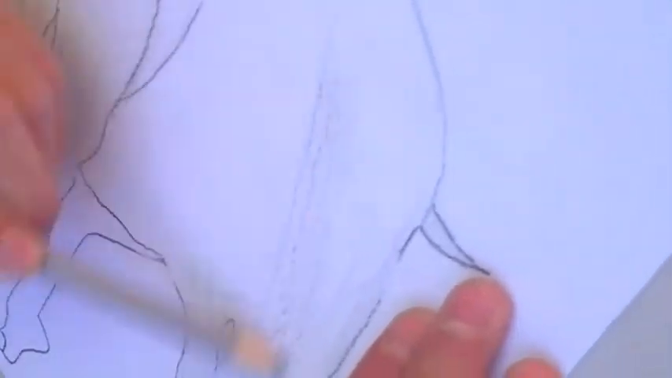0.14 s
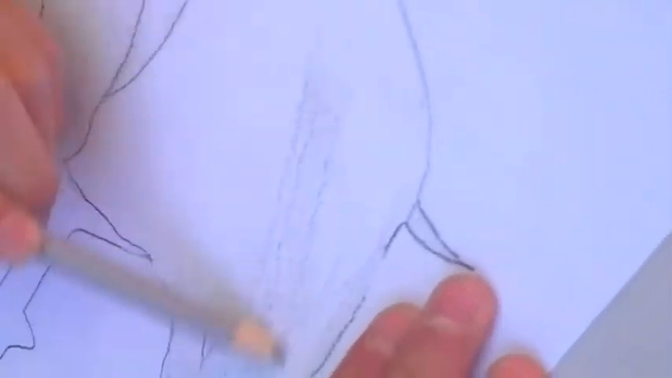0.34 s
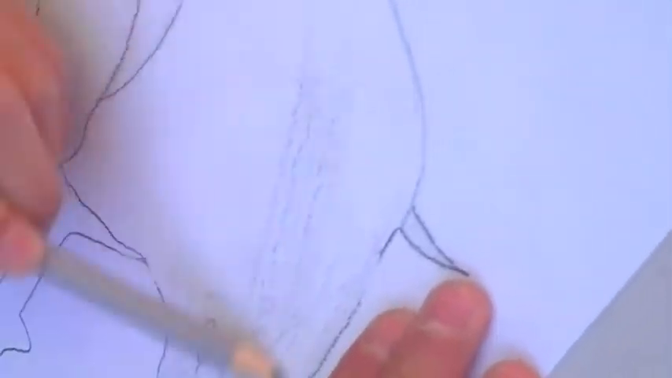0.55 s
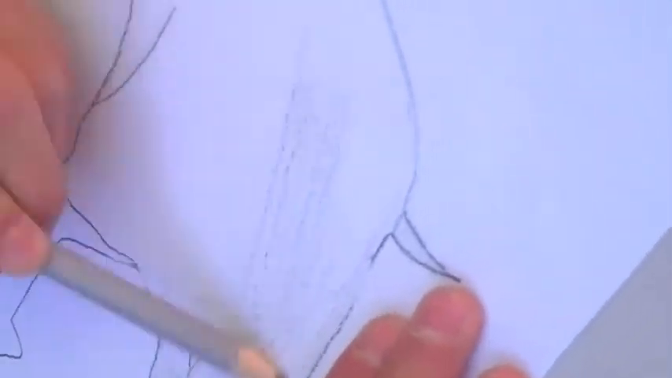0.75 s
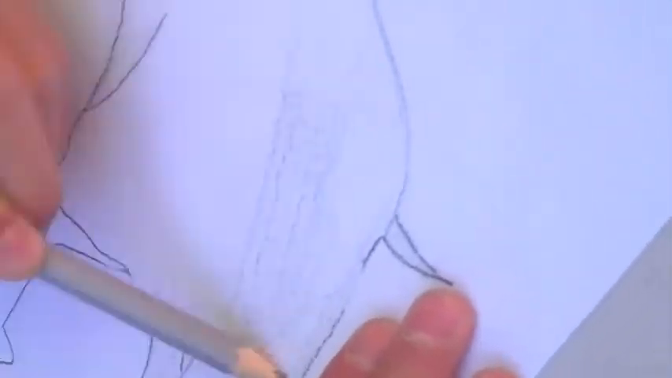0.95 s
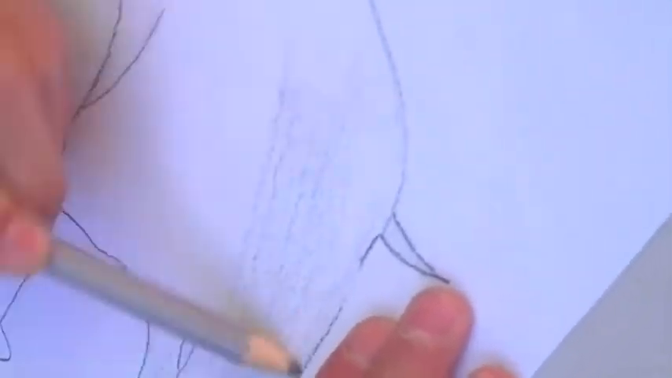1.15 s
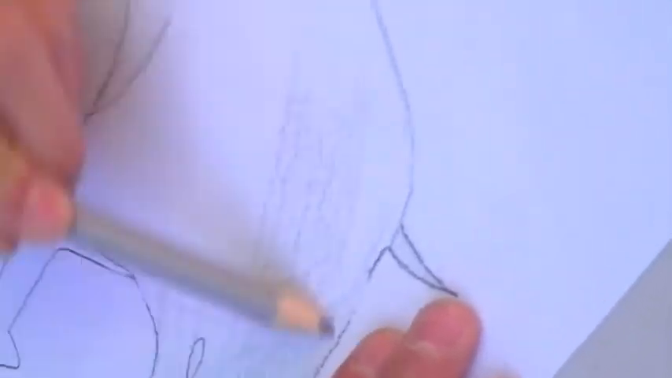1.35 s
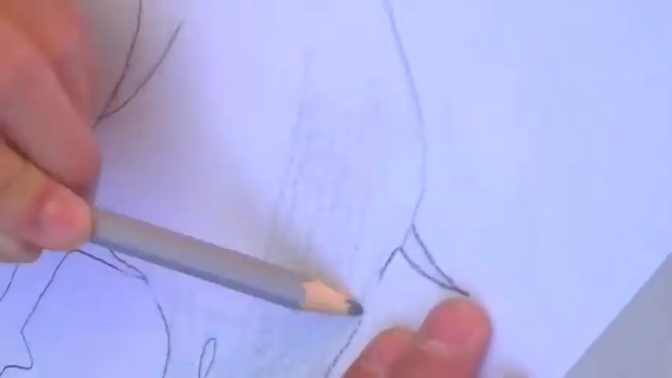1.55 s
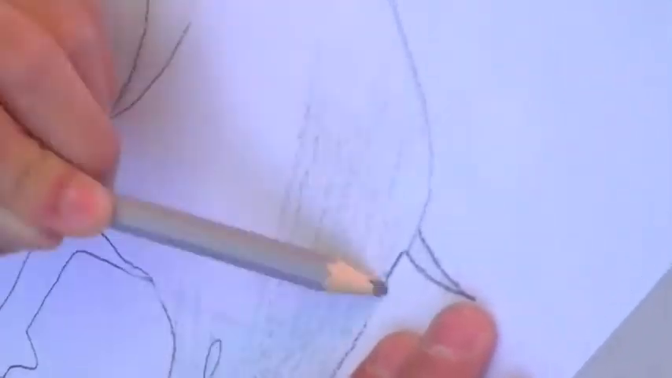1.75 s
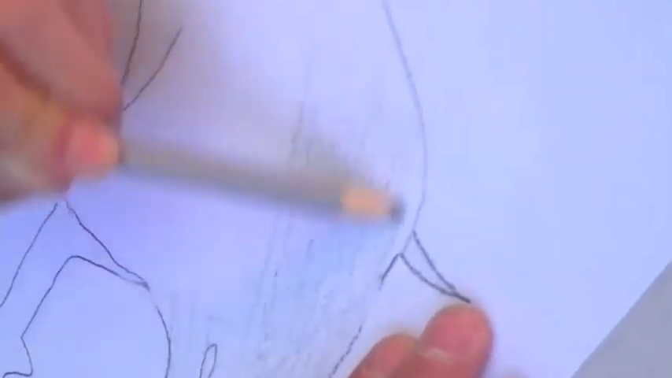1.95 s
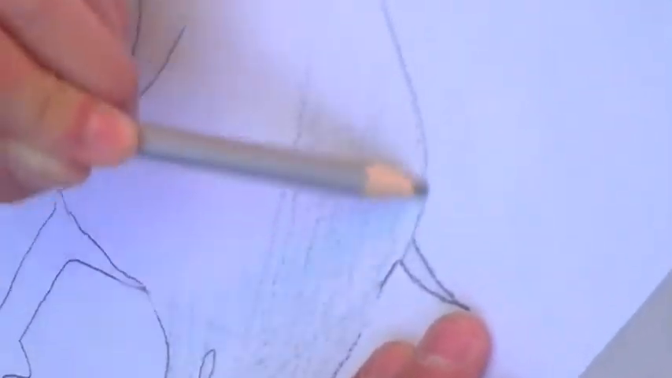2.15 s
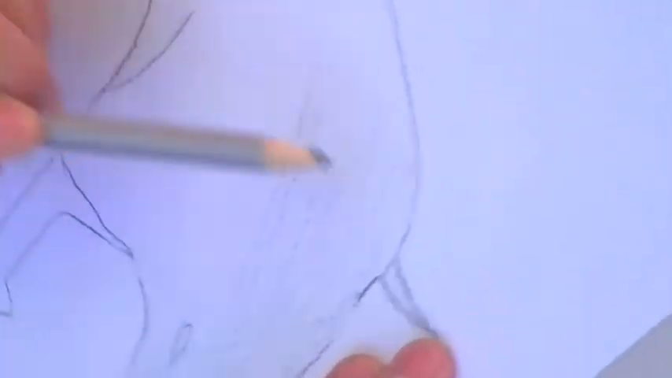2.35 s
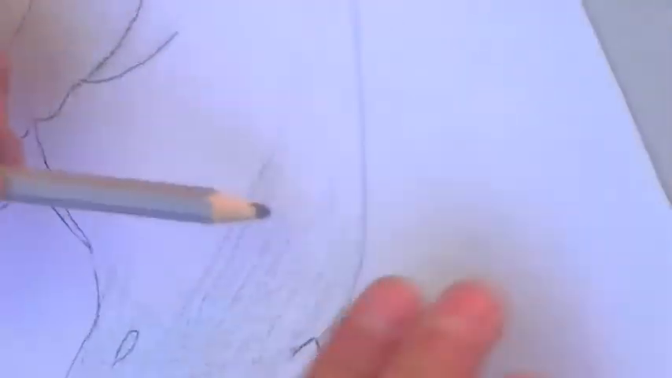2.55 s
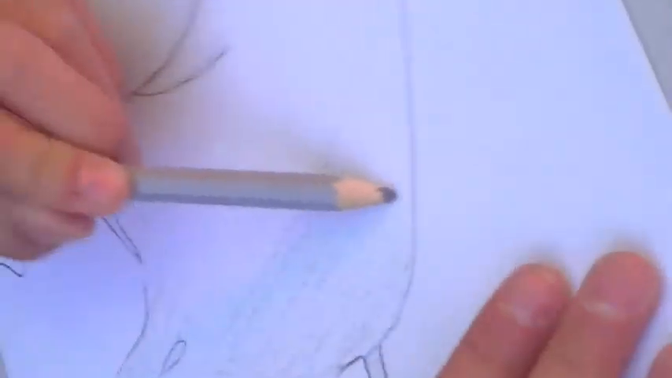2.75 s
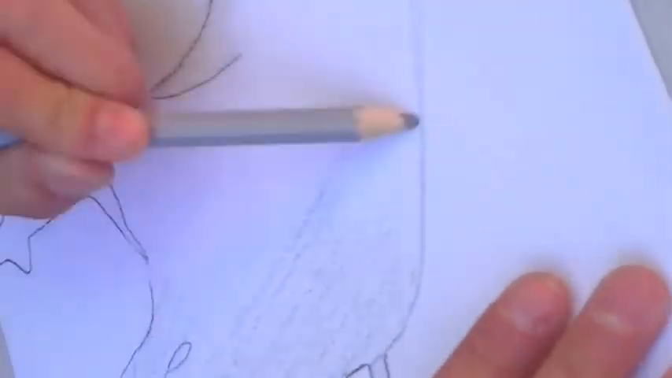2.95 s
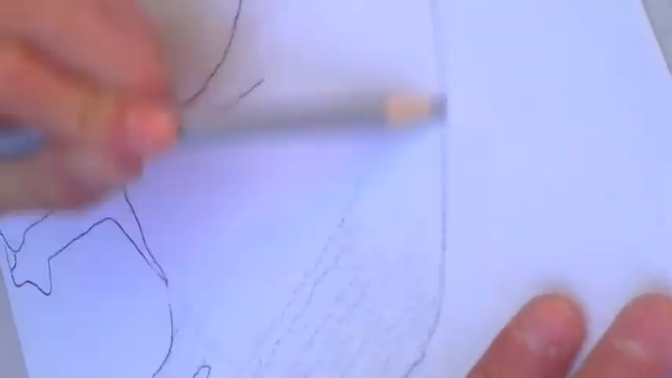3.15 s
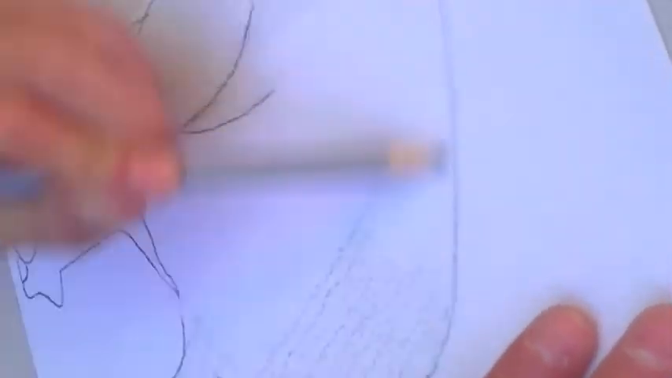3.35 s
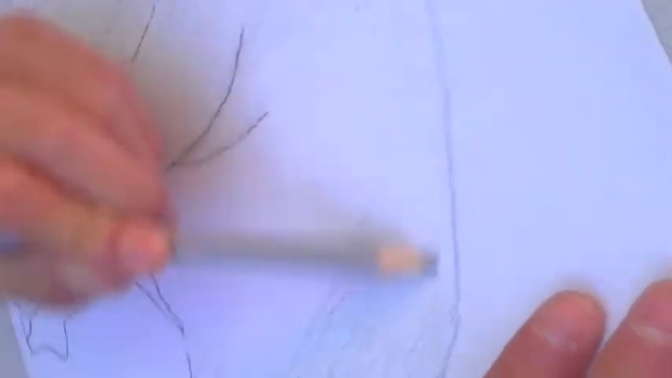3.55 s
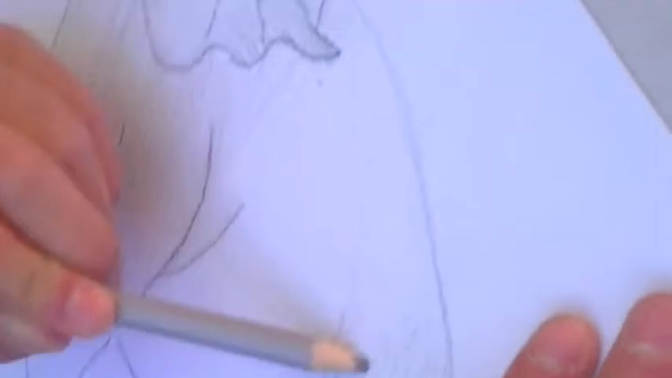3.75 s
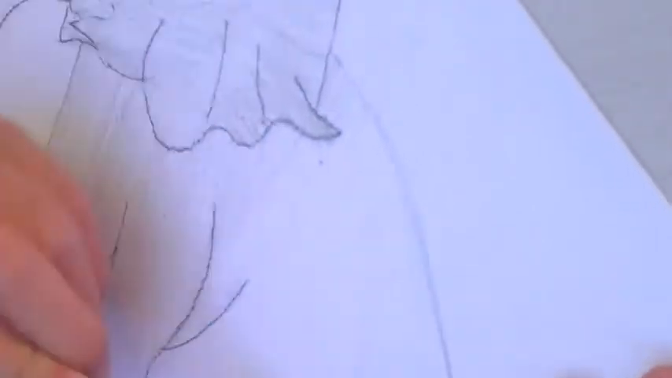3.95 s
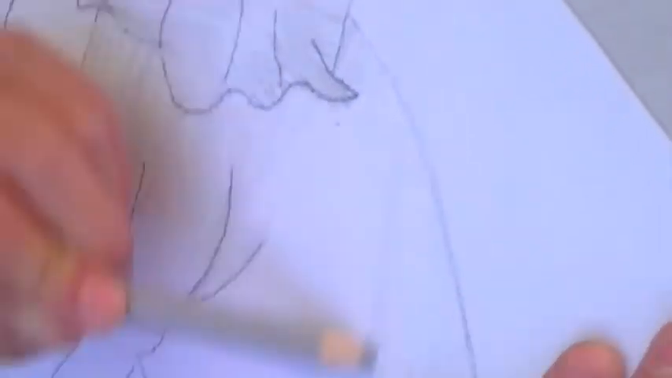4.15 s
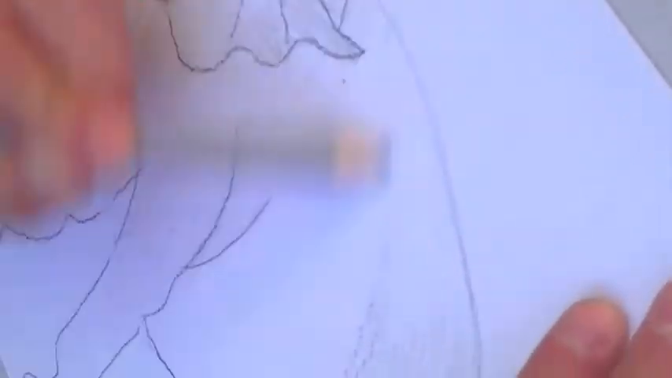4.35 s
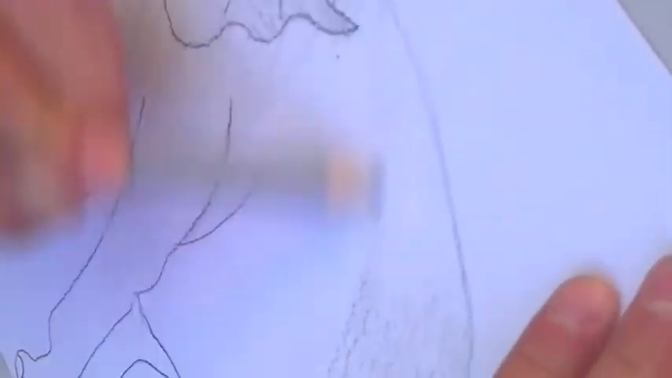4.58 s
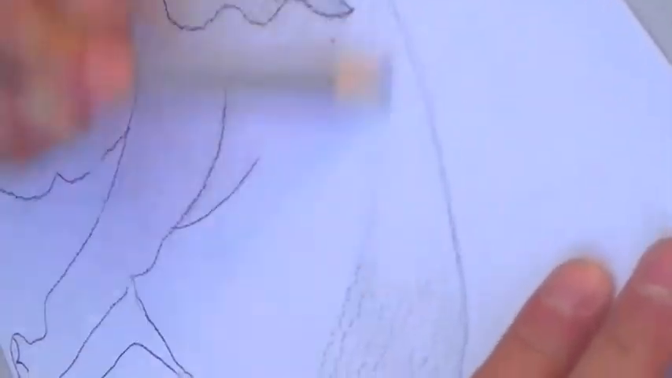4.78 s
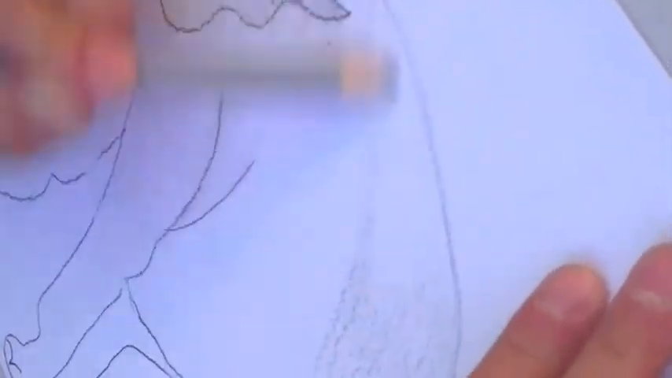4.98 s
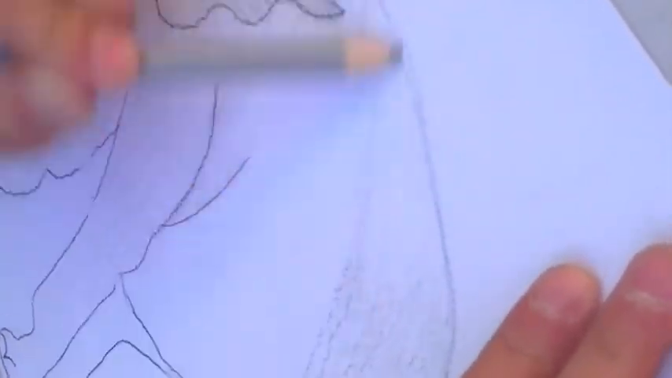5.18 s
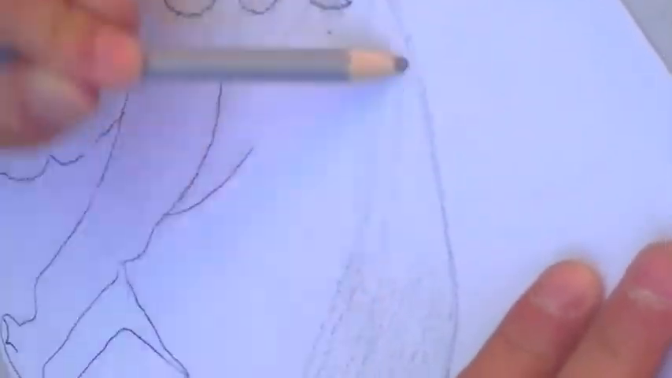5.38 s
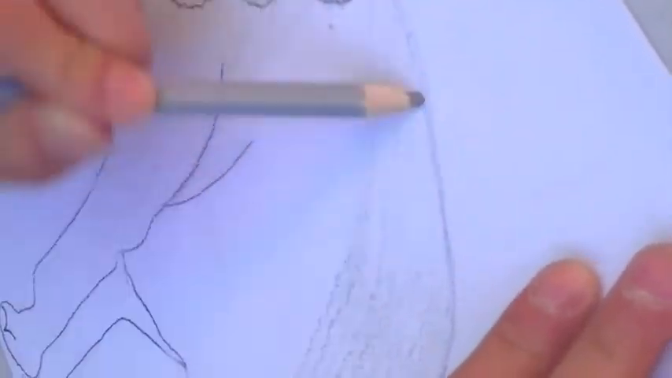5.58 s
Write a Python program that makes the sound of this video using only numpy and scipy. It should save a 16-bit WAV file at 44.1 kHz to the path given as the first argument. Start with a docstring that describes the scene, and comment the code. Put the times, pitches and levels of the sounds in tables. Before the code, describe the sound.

A pencil shades paper on a table, very close to a small stereo microphone. Rapid back-and-forth strokes rasp about ten times a second, with a papery ring. Hard clicks strike early and near one and a half seconds; the scratching softens and slows in the middle, then returns, with a cluster of knocks near four seconds. Steady hiss lies beneath in a small dry room.

```python
"""Pencil shading at a table

A coloured pencil shades paper on a table in a quiet, hissing room, close to a small stereo microphone.
The lead's rasp is shaped noise, louder and brighter in mid-stroke, about ten strokes a second.
Pencil and sheet ring as noise-driven resonances, strongest near 2 kHz.
Now and then the pencil knocks on the table through the paper: filtered impulses ring decaying modes.
Slips of the sheet add soft scuffs, brief swells of one resonance."""
import sys
import numpy as np
from scipy import signal
from scipy.fft import rfft, irfft
from scipy.io import wavfile
from scipy.ndimage import uniform_filter1d

SR = 44100
rng = np.random.default_rng(int(sys.argv[2]) if len(sys.argv) > 2 else 0)


def put_to_file(sound):
    """Save the sound as 16-bit audio at rate SR, in the file named by the first command-line argument."""
    columns = np.atleast_2d(sound).T  # one column per channel
    safe = np.clip(columns, -1, 1)
    whole_steps = np.round(safe * 32767)
    wavfile.write(sys.argv[1], SR, whole_steps.astype(np.int16))


N = 247842


def undb(db):
    """Decibels to gain."""
    return 10 ** (np.asarray(db) / 20)


def unit(x):
    """Scale to rms 1."""
    return x / np.sqrt(np.mean(x ** 2))


def walk(rate_hz):
    """Smooth random wandering with rms 1: noise averaged twice over 1 / rate_hz seconds."""
    span = max(int(SR / rate_hz), 1)
    noise = rng.standard_normal(N)
    return unit(uniform_filter1d(uniform_filter1d(noise, span), span))


def shape(points):
    """Gain at every frequency bin, joining (f/Hz, level/dB) points on a log frequency axis."""
    hz, db = np.transpose(points)
    bins_hz = np.fft.rfftfreq(N, 1 / SR)
    return undb(np.interp(np.log(bins_hz + 1), np.log(hz), db))  # +1 avoids log 0


def hiss(colour, side):
    """Stereo noise of a given colour and width; rms 1 in the middle."""
    spectra = rfft(rng.standard_normal((2, N))) * shape(colour)
    spectra[1] *= shape(side)
    mid, wide = irfft(spectra, N)
    return np.array([mid + wide, mid - wide]) / mid.std()


# stereo width of the pencil, close to the microphone: f/Hz, side minus mid level/dB
PENCIL_SIDE = [(150, -5), (400, -26), (1400, -43), (2300, -8), (4400, -5.5), (6500, -6), (8500, 1),
               (14000, 0.5)]


def resonance(hz, width_hz, shift):
    """A resonance driven by dense friction: noise about a moving centre hz * shift; rms 1 in the middle."""
    pole = np.exp(-2 * np.pi * .78 * width_hz / SR)  # two such poles give the -3 dB width
    drive = rng.standard_normal((2, N)) + 1j * rng.standard_normal((2, N))
    envelope = signal.lfilter([1], [1, -2 * pole, pole ** 2], drive)
    carrier = np.exp(2j * np.pi * np.cumsum(hz * shift) / SR)
    mid, wide = unit((envelope * carrier).real)
    wide = wide * undb(np.interp(hz, *np.transpose(PENCIL_SIDE)))
    return np.array([mid + wide, mid - wide])


# colour of the room and microphone hiss: f/Hz, relative level per Hz/dB
HISS_COLOUR = [(25, 20), (60, -7.5), (130, -1.5), (340, 3), (600, -1.5), (1000, -8.5), (1300, 3.5),
               (1600, -2), (2500, 3), (4900, 1), (6500, -12), (8000, -13), (12000, -22.5), (15000, -34)]
# its stereo width: f/Hz, side minus mid level/dB
HISS_SIDE = [(100, 3.5), (400, 2), (1300, -9), (2500, -7), (5000, -4.5), (9000, 0.5)]


def background():
    """Hiss of the room and the microphone: shaped noise whose level wavers slightly."""
    level_db = -51 + .5 * walk(30)
    return hiss(HISS_COLOUR, HISS_SIDE) * undb(level_db)


# runs of back-and-forth strokes, each at an even pace until the next begins:
# start t/s, number of strokes, lean level/dB (added on one direction, taken off the other)
STROKE_RUNS = [(0.018, 9, 1.7), (0.942, 5, -0.6), (1.467, 5, 0.5), (1.928, 2, -0.5), (2.098, 3, .9),
               (2.365, 1, .5), (2.585, 1, -6.5), (2.829, 3, 1), (3.155, 6, 0), (3.842, 8, 1),
               (4.731, 9, 0.5)]
# single strokes with extra pressure (0 leaves the stroke as it is): t/s, extra level/dB
STROKE_ACCENTS = [(0.68, 0), (0.89, 1), (3.21, 3), (3.44, 1.5), (4.78, 0.5), (5.41, 1.5)]


def hand(stick=.75):
    """Tip speed (0 at each turn, 1 in full swing) and the extra pressure of the current stroke in dB."""
    last_turn_s, speed_up_s, slow_down_s = 5.678, .048, .056
    start, count, lean_db = np.transpose(STROKE_RUNS)
    t = np.arange(N) / SR
    edges, count = np.append(start, last_turn_s), np.rint(count)
    done = np.append(0, np.cumsum(count))
    travel = np.interp(t, edges, done)  # strokes made so far
    stroke, along = travel.astype(int), travel % 1
    run = np.clip(np.searchsorted(start, t) - 1, 0, len(start) - 1)
    length_s = (np.diff(edges) / count)[run]
    direction = 1 - 2 * ((stroke - done[run]) % 2)
    since_turn, until_turn = along * length_s, (1 - along) * length_s
    swing = np.clip(np.minimum(since_turn / speed_up_s, until_turn / slow_down_s), 0, 1)
    # the waxy lead clings after each turn, then breaks free
    clinging = since_turn < rng.uniform(.01, .032, stroke.max() + 1)[stroke]
    speed = np.sin(np.pi / 2 * swing) * np.where(clinging, stick, 1)
    accent_db = sum(db * (stroke == int(np.interp(s, edges, done))) for s, db in STROKE_ACCENTS)
    return speed, direction * lean_db[run] + accent_db


def snags():
    """The lead catches on raised fibres: sudden jumps in dB that relax within milliseconds, mean 0."""
    per_second, base_jump_db, relax_s = 30, 1.2, 0.008
    caught = rng.random(N) < per_second / SR
    catches = caught * rng.uniform(0.65, 2.4, N) * base_jump_db
    jumps = signal.lfilter([1], [1, -np.exp(-1 / (relax_s * SR))], catches)
    return jumps - jumps.mean()


def patchy(x, depth_db, across_hz, lasting_s, size=256):
    """The paper's tooth differs by spot: neighbouring frequencies swell and fade together for moments."""
    hz, s, spectra = signal.stft(x, SR, nperseg=size)
    field = rng.standard_normal(spectra.shape[1:])
    for axis, span in enumerate([across_hz / hz[1], lasting_s / s[1]]):
        span = max(int(span), 1)
        field = uniform_filter1d(uniform_filter1d(field, span, axis=axis), span, axis=axis)
    gain = unit(undb(depth_db * unit(field)))
    return signal.istft(spectra * gain, SR, nperseg=size)[1][:, :N]


# working levels in mid-stroke, before pressure changes:
# t/s, rasp level/dB, ring of pencil and sheet level/dB, finest grain level/dB
HAND_EFFORT = [(0.0, -42, -38.5, -55.5), (0.38, -43, -41, -52.5), (0.88, -43.5, -40.5, -53.5),
               (1.25, -45.5, -42.5, -53.5), (1.65, -47.0, -43.5, -53.5), (2.0, -47, -55.5, -57.5),
               (2.25, -52, -64, -62), (2.48, -50, -65, -57.5), (2.7, -58.5, -62, -78),
               (3.0, -46.5, -45.5, -60.0), (3.2, -47, -46, -75), (3.5, -47, -46, -61),
               (3.75, -52.5, -53.5, -62), (4.22, -47, -43.5, -56), (4.6, -47.5, -43.0, -56.5),
               (4.95, -48.5, -43, -59.5), (5.3, -46, -41, -58.5), (5.62, -45.0, -41.5, -58)]
# friction noise of the lead on the paper: f/Hz, relative level per Hz/dB
RASP_COLOUR = [(100, -41), (330, -25), (600, -33), (1000, -36), (1400, -2.5), (2600, -5.5), (3300, 0.5),
               (4100, 3), (5100, 3), (6850, 5.5), (7800, -9.5), (9500, -12), (13000, -47)]
# its finest grain: f/Hz, relative level per Hz/dB
GRAIN_COLOUR = [(3000, -2.5), (6000, 5), (8000, 0.5), (9000, 3), (10000, -5.5), (11500, -1.5),
                (13000, -8.5), (15000, -38)]
# higher resonances of the lead and its wooden cone: nominal f/Hz, width f/Hz, relative level/dB
LEAD_MODES = [(3960, 114, -11), (4486, 160, -13.5), (4977, 190, -7.5), (5770, 330, -9), (6330, 190, -17)]
# resonances of pencil and sheet under the dragging lead: nominal f/Hz, width f/Hz, relative level/dB
BODY_MODES = [(336, 32, -17), (666, 107, -23), (1449, 200, -12), (1954, 131, -.5), (2468, 250, -5.5),
              (2920, 210, -13)]


def shading():
    """Shaped noise makes a rasp that follows the speed.

    The body rings mostly in mid-stroke, where the tip moves fastest."""
    speed, stroke_db = hand()
    s, *levels = np.transpose(HAND_EFFORT)
    rasp_db, ring_db, grain_db = (np.interp(np.arange(N) / SR, s, db) for db in levels)
    # a hand that makes the pencil ring at this level snags fully; a lighter one glides
    firm_ring_db = -42
    snag_db = snags() * np.minimum(undb(ring_db - firm_ring_db), 1)
    tooth_db = 0.6 * walk(61) + 1.03 * walk(126)  # the paper's uneven tooth
    pressure_db = stroke_db + snag_db + tooth_db
    shift = 1 + .03 * (speed - .6) + .02 * walk(15)
    # each resonance swells and fades on its own, wandering at random
    lead = sum(resonance(hz, width, shift) * undb(db + 2.0 * walk(40)) for hz, width, db in LEAD_MODES)
    body = sum(resonance(hz, width, shift) * undb(db + 0.65 * walk(28)) for hz, width, db in BODY_MODES)
    # higher powers of speed crowd the sound into mid-stroke
    rasp = (hiss(RASP_COLOUR, PENCIL_SIDE) + lead) * speed ** 0.67 * undb(rasp_db)
    grain = hiss(GRAIN_COLOUR, PENCIL_SIDE) * speed * undb(grain_db)
    scratch = patchy(rasp + grain, depth_db=2.5, across_hz=900, lasting_s=.018)
    body_ring = body * speed ** 2.45 * undb(ring_db)
    return (scratch + body_ring) * undb(pressure_db)


def ring(modes, t):
    """Sum of decaying modes after a blow."""
    out = 0
    for hz, t60, db in modes:
        out = out + undb(db) * np.sin(2 * np.pi * hz * t) * np.exp(-np.log(1000) * t / t60)
    return out


# pencil knocks, direct sound: t/s, peak level/dB, contact cut-off f/Hz, table thud peak level/dB,
# frequency ratio of the spot struck
PENCIL_KNOCKS = [(0.03, -31.5, 2500, -53, 1.06), (0.2224, -36.5, 2000, -60, 1.16),
                 (0.468, -15, 2300, -44, 1), (0.4764, -26.5, 2300, -44, 0.85),
                 (1.4134, -11, 2400, -48, 1.07), (1.428, -24.5, 1900, -52, 1.05),
                 (1.609, -37, 1510, -55, 1.3), (3.2018, -26, 2200, -41, 0.93),
                 (3.344, -44.5, 1500, -44, 0.97), (3.434, -39.5, 2286, -44, 1.05),
                 (3.8128, -22.5, 2400, -38, 0.95), (3.8565, -20.5, 3000, -45, 1.01),
                 (3.91, -28.5, 2500, -40, 0.99), (3.941, -24.5, 1800, -52, 0.91),
                 (3.9519, -5.5, 2160, -41, 1.013), (3.9643, -33, 2700, -55, 1.04),
                 (5.005, -25, 1500, -51, 0.73), (5.0103, -21.5, 900, -43, 0.98),
                 (5.027, -28.5, 1510, -40, 1)]
# what a knock rings with at spot ratio 1: f/Hz, decay by 60 dB t/s, relative level/dB
PENCIL_KNOCK_MODES = [(337, 0.012, -8), (730, 0.018, -9), (1010, 0.028, -16), (1380, 0.018, -7),
                      (1470, 0.009, 13), (1784, 0.02, 4), (2870, 0.0044, 8), (3100, 0.0048, -8)]
# the table top under it: f/Hz, decay by 60 dB t/s, relative level/dB
TABLE_TOP_MODES = [(146, 0.046, -9), (204, 0.031, 1.5), (279, 0.032, 1.5)]


def knocks(skid_db=-21, rebound_s=0.001467, rebound=0.25, crack_db=-21):
    """Paper softens each blow, rounding off its upper modes; the tip rebounds and skids, longer if light."""
    typical_db, typical_skid_s, skid_halves_per_db, longest_skid_s = -25, 0.0023, 0.6, 0.01
    out, t = np.zeros(N + SR), np.arange(SR // 8) / SR
    thud = ring(TABLE_TOP_MODES, t) * (1 - np.exp(-t / 0.0018))  # the heavy top takes a moment to move
    for s, db, contact_hz, thud_db, spot in PENCIL_KNOCKS:
        firm_db = db - typical_db
        skid_s = min(typical_skid_s * .5 ** (skid_halves_per_db * firm_db), longest_skid_s)
        force = rng.standard_normal(len(t)) * np.exp(-t / skid_s) * undb(skid_db)
        force[0] = 1
        force[int(rebound_s / spot * SR)] += rebound
        soft_contact = signal.butter(2, min(contact_hz, SR / 3), fs=SR, output="sos")
        force = signal.sosfilt(soft_contact, force)
        crack = rng.standard_normal(len(t)) * np.exp(-t / .001) * undb(crack_db)
        response = ring(PENCIL_KNOCK_MODES, t * spot) + crack
        blow = signal.fftconvolve(force, response)[:len(t)]
        # a thin pencil radiates little bass
        blow = signal.sosfilt(signal.butter(1, 240, "highpass", fs=SR, output="sos"), blow)
        i = int(s * SR)
        out[i:i + len(t)] += undb(db) * blow / abs(blow).max()
        out[i:i + len(t)] += undb(thud_db) * thud / abs(thud).max()
    return out[:N]


def room(x, t60, wet_db):
    """Faint, short reflections as decaying noise, different at each side."""
    t = np.arange(SR // 2) / SR
    decay = np.exp(-np.log(1000) * t / t60)
    tail = rng.standard_normal((2, len(t))) * decay * (t > .003)
    tail = tail / np.sqrt(np.sum(tail ** 2, axis=1, keepdims=True))
    return x + undb(wet_db) * signal.fftconvolve(x[None], tail, axes=1)[:, :N]


# soft scuffs as the hand shifts the sheet: centre t/s, level/dB, half length t/s
SHEET_SCUFFS = [(1.439, -41, .008), (3.89, -48, 0.018), (4.163, -45, 0.016), (5.015, -39, 0.0043),
                (5.031, -44, 0.0065)]


def scuffs():
    """Each slip of the sheet briefly swells one of its resonances."""
    centre_hz, width_hz = 1338, 240
    t = np.arange(N) / SR
    swell = sum(undb(db) * np.exp(-((t - s) / half_s) ** 2) for s, db, half_s in SHEET_SCUFFS)
    return resonance(centre_hz, width_hz, np.ones(N)) * swell


def scene():
    """Shading, knocks with their reflections, and scuffs over the hiss."""
    knocks_in_room = room(knocks(), t60=0.074, wet_db=-15)
    return background() + shading() + knocks_in_room + scuffs()


def record(dry):
    """The recorder thins the deep bass, cuts the top and sits slightly off zero."""
    bass_hz, top_hz, offset = 95, 15200, -.0023
    thin = signal.sosfilt(signal.butter(2, bass_hz, "highpass", fs=SR, output="sos"), dry)
    return signal.sosfilt(signal.ellip(8, .2, 70, top_hz, fs=SR, output="sos"), thin) + offset


dry = scene()
out = record(dry)
put_to_file(out)
```